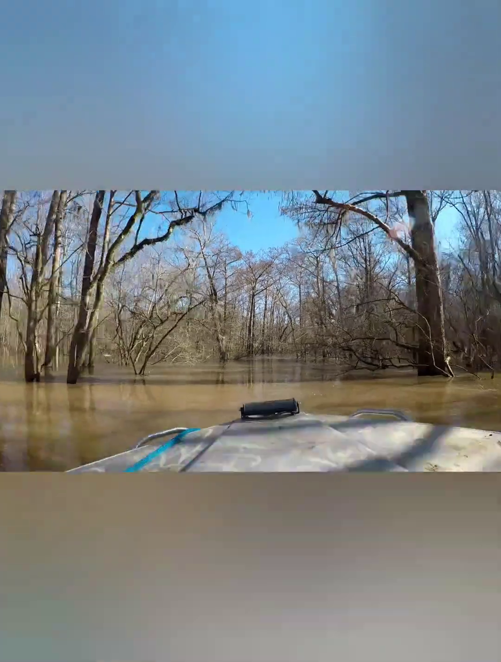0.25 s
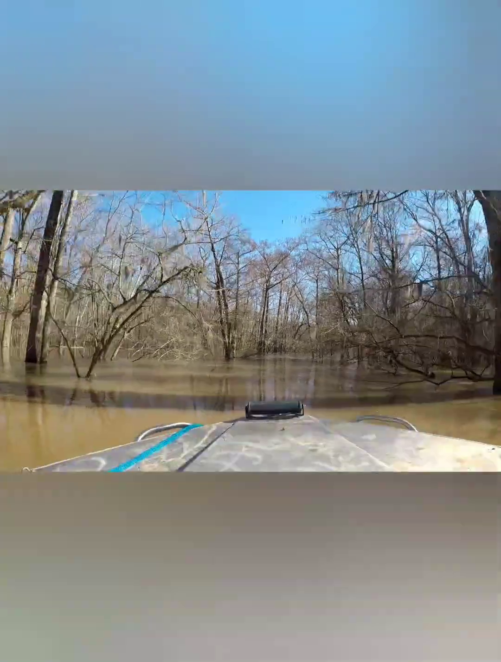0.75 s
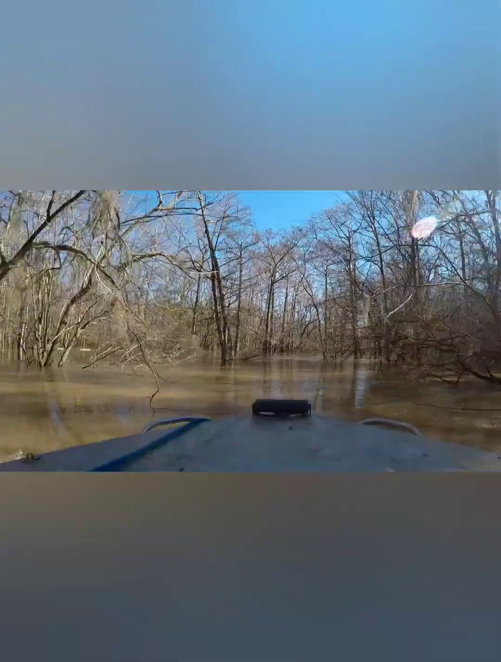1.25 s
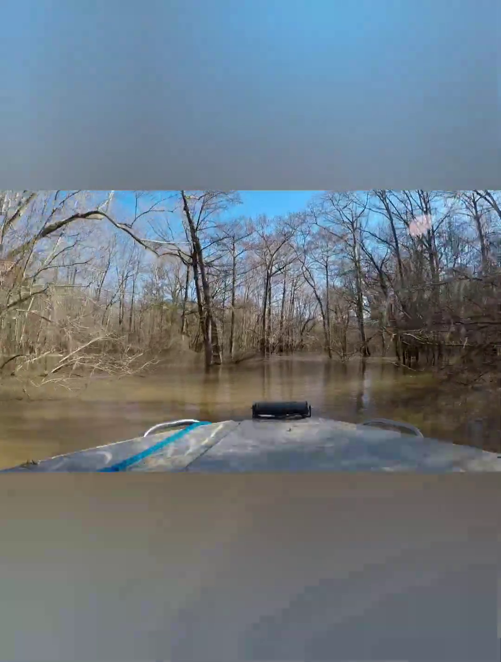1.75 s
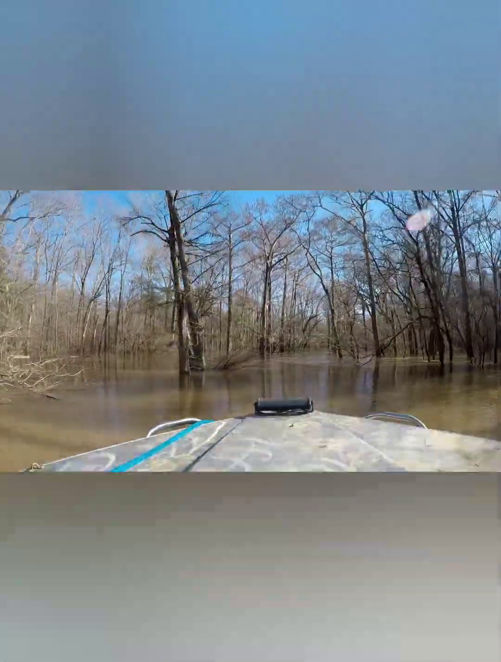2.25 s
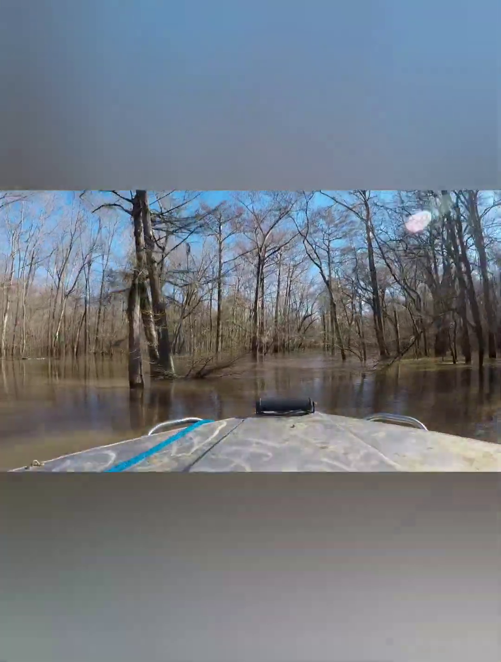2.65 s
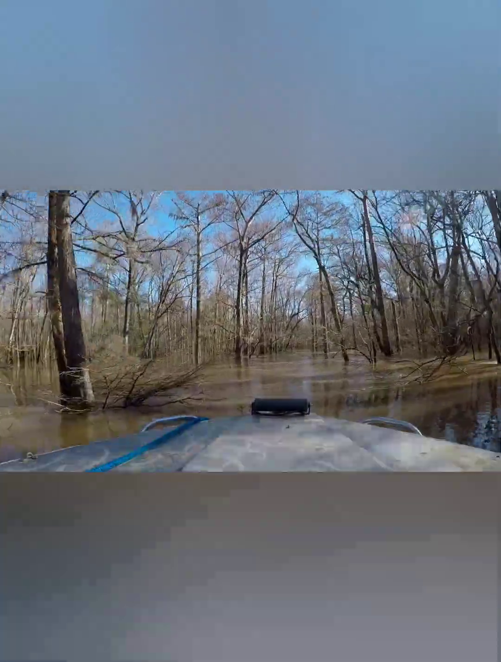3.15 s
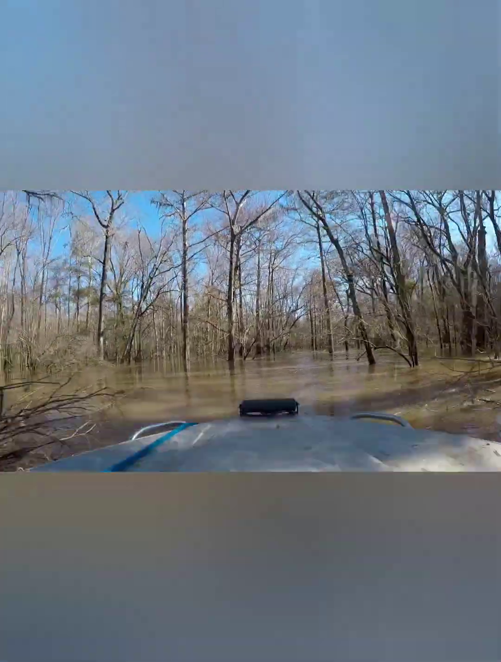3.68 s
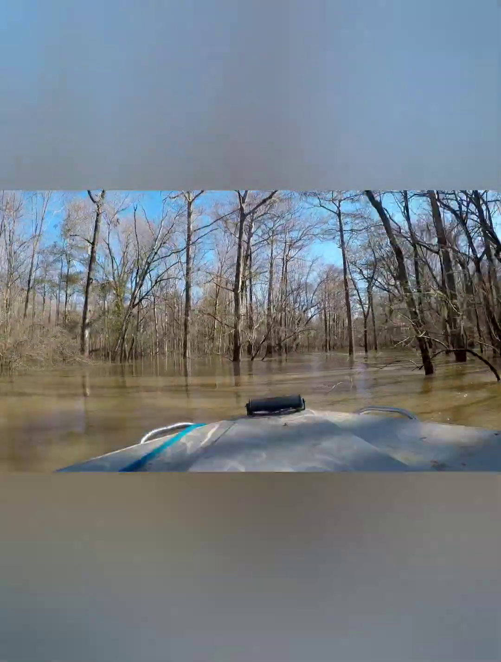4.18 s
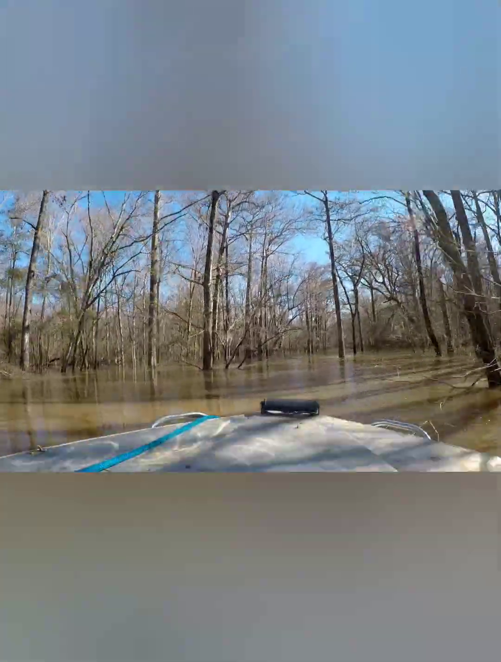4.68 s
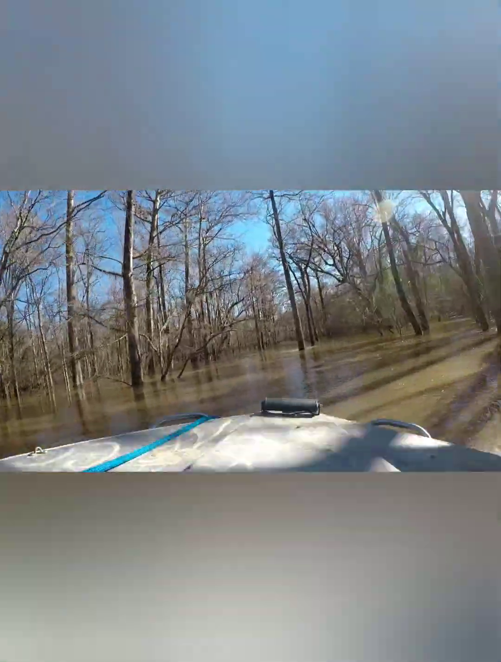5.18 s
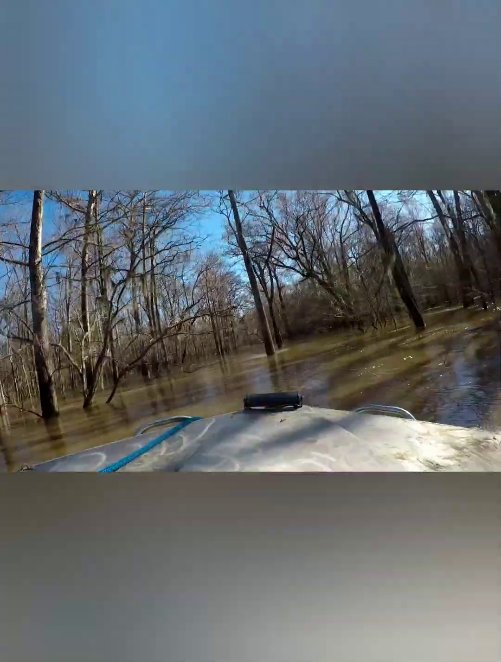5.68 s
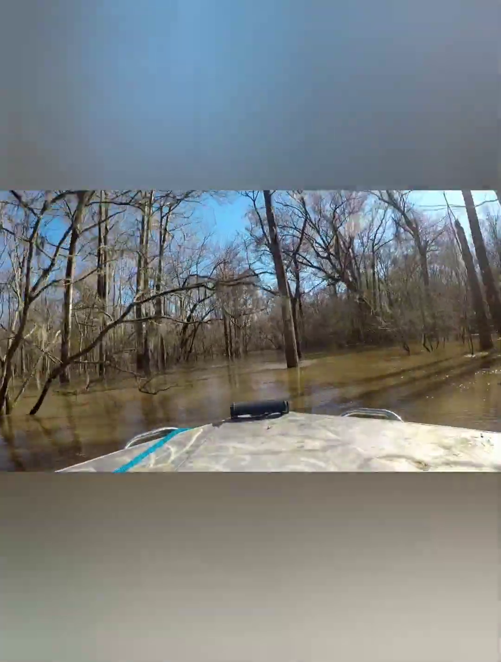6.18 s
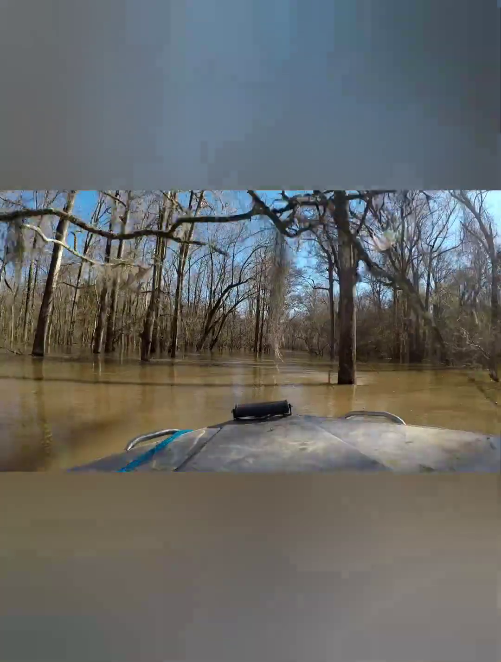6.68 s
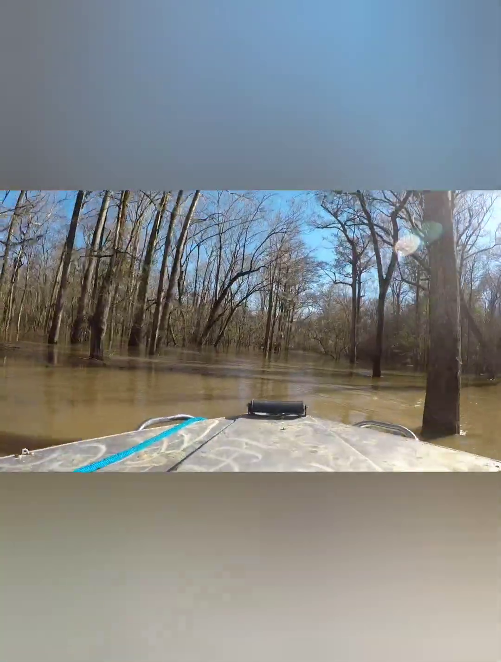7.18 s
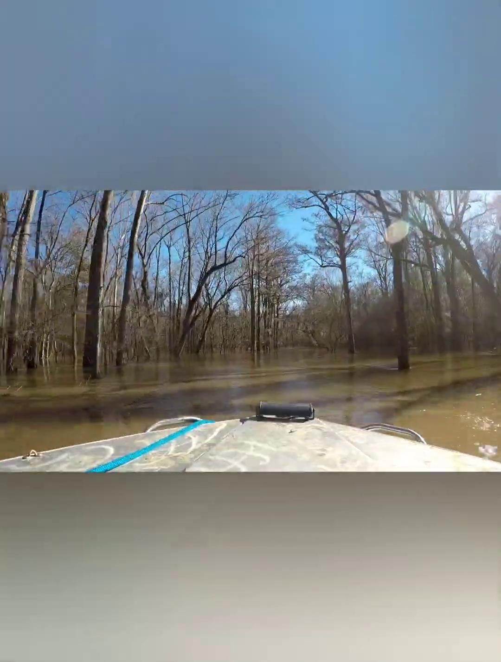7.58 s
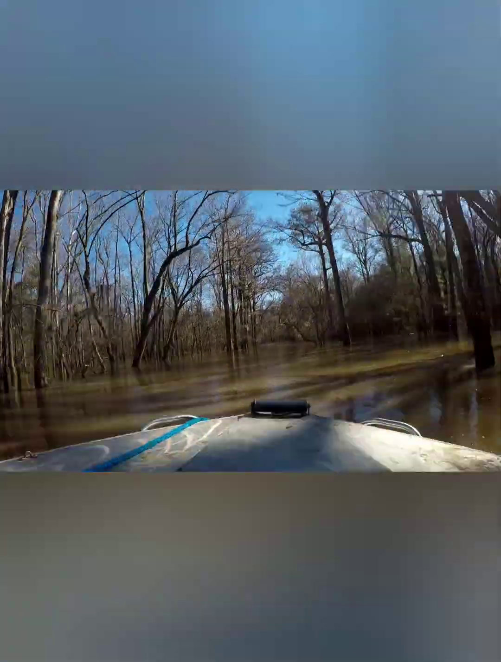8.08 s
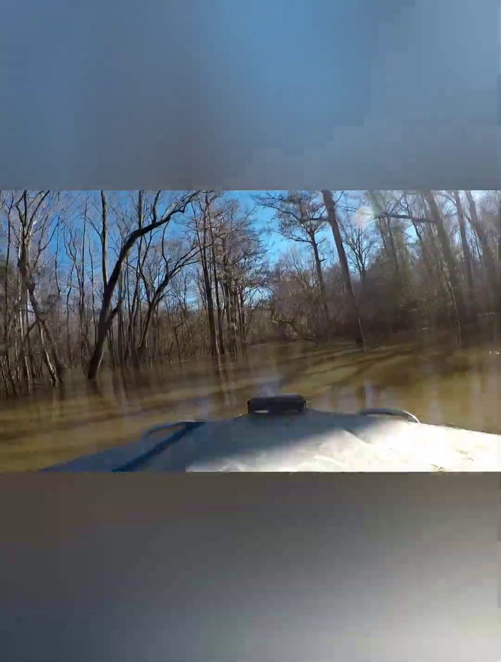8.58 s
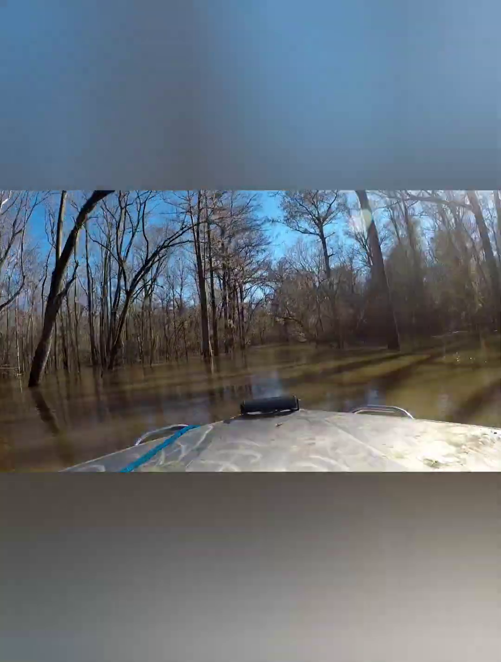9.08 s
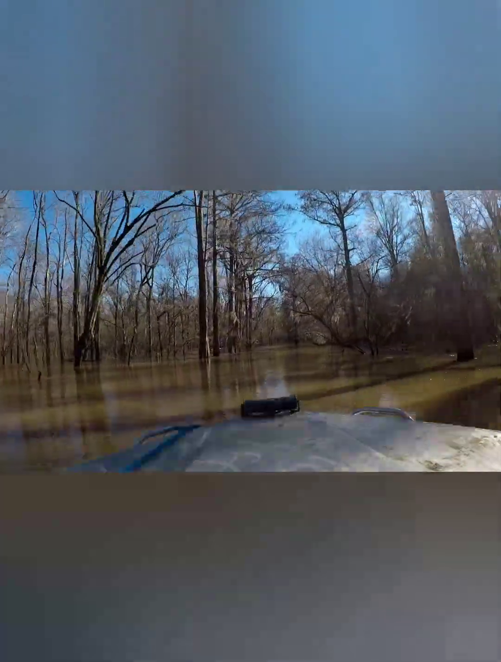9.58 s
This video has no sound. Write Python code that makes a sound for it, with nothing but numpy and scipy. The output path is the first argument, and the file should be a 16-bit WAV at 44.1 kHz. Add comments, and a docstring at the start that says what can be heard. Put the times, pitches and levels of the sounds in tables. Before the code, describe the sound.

A small jet boat runs through a flooded wood, heard from a microphone in a closed housing fixed to its hull. The loud four-cylinder engine and geared pump make a thick, buzzing drone with a wavering whine, over drumming water, low wind rumble, rushing pump flow and faint gusting spray. From 0 to 1 second the pitch drops, then sags slowly until about 4.1. It jumps up at 4.3-4.5 and climbs to its highest, roughest point near 5.6, then descends to about 8.4, holds, and rises again from 9.3 to the end. Small twig ticks come at 0.8, 1.8, 2.0 and 5.2; a sharp crackling cluster strikes at 6.7-6.85, ending in a duller knock. Soft bow slaps lift the water at 5.2 and 7.6. Dull hull knocks land at 8.5 and 8.75, with a last tick at 9.8. The level stays dense and even.

```python
"""A four-cylinder engine and its geared pump drive a small jet boat through a flooded wood.
Their tones are wavering sines on orders of the firing rate, swelling at the hull's panel resonances.
Shaped noise makes the water roar, wind rumble, pump rush and spray; modes of panels and fittings ring.
Twigs and duller knocks are short noise bursts. One microphone hears all this in a closed housing fixed
to the hull, and a limiter holds the level."""
import sys
import numpy as np
from scipy import signal
from scipy.io import wavfile
from scipy.ndimage import uniform_filter1d

SR = 44100
rng = np.random.default_rng(int(sys.argv[2]) if len(sys.argv) > 2 else 0)


def pcm_store(signal):
    """Save signal as 16-bit PCM."""
    levels = np.round(np.clip(np.atleast_2d(signal), -1, 1) * 32767)
    wavfile.write(sys.argv[1], SR, levels.astype(np.int16).T)


N = 434385  # length in samples

# Water flow, levels ahead of gusts and slaps: t/s, pump rush level/dB, spray level/dB, high fizz level/dB
WATER_FLOW = [(0.0, -27, -44, -83), (0.3, -27, -42, -76), (0.55, -32, -45.5, -73),
              (0.85, -30.5, -45.5, -62), (1.6, -29, -42, -58), (2.2, -30, -43, -60),
              (3.26, -30.5, -44, -62), (3.7, -31, -41, -58.5), (4.4, -28.5, -42, -64),
              (4.85, -27, -42, -57), (5.46, -26, -42.5, -64), (6.04, -23.5, -40.5, -65),
              (6.5, -27.5, -42, -62), (7.1, -30.5, -43.5, -68), (7.49, -31.5, -46.5, -61),
              (8.3, -34.5, -47.5, -62), (8.75, -30.5, -46.5, -62), (9.85, -29, -44, -65)]
# Engine speed: t/s, firing rate f/Hz
FIRING_RATE = [(0, 213.8), (.35, 211), (.6, 204), (.95, 190.5), (1.2, 187.5), (1.95, 185), (2.3, 178.5),
               (2.7, 180), (3.4, 180), (4.05, 173.3), (4.19, 175), (4.27, 182), (4.42, 206), (4.5, 210),
               (4.65, 214.5), (4.95, 220.4), (5.1, 228.3), (5.4, 245.6), (5.58, 251), (5.75, 249.5),
               (6.3, 235.7), (6.75, 230.3), (7.05, 224.7), (7.35, 222.7), (7.65, 212.9), (7.95, 200.5),
               (8.4, 198.5), (8.75, 201), (9.2, 201.2), (9.45, 205), (9.68, 212), (9.85, 225)]


def gain_of(db):
    """Level definition: an amplitude ratio is ten to the power of dB / 20."""
    return 10 ** (np.asarray(db) / 20)


def evened(x):
    """Normalisation: scales to unit rms."""
    return x / np.sqrt(np.mean(x ** 2) + 1e-20)


def curve(table, column):
    """Linear interpolation of one table column over time, at every sample."""
    rows = np.asarray(table)
    return np.interp(np.arange(N) / SR, rows[:, 0], rows[:, column])


def add(mix, start_s, sound):
    """Superposition: adds a sound into the mix from its start time."""
    part = mix[round(start_s * SR):][:len(sound)]
    part += sound[:len(part)]


def drift(width_hz):
    """Narrow-band modulation: complex noise through two equal one-pole low-passes, unit rms."""
    step = 16  # samples between random draws
    pole = np.exp(-step * np.pi * width_hz / SR)
    at = np.arange(0, N + step, step)
    z = rng.standard_normal(len(at)) + 1j * rng.standard_normal(len(at))
    for _ in range(2):
        z = signal.lfilter([1], [1, -pole], z)
    z = np.interp(np.arange(N), at, z)
    return z / np.sqrt(np.mean(abs(z) ** 2))


def noise(points, patchy_db, flicker_db, size):
    """Short-time synthesis: random spectra with drifting patches and a flicker shared by all pitches; rms 1."""
    frames, hz = 4 * N // size + 5, np.fft.rfftfreq(size, 1 / SR)
    real, imag, patches = rng.standard_normal((frames, len(hz), 3)).T
    patches = uniform_filter1d(patches, size=9, axis=0)  # smooth along pitch
    patches = evened(uniform_filter1d(patches, size=9, axis=1))  # smooth along time
    flicker = evened(uniform_filter1d(rng.standard_normal(frames), size=5))
    point_hz, point_db = np.transpose(points)
    shape_db = np.interp(np.log(hz + 1), np.log(point_hz + 1), point_db, -120, -120)
    level_db = shape_db[:, None] + patchy_db * patches + flicker_db * flicker
    spectra = (real + 1j * imag) * gain_of(level_db)
    return evened(signal.istft(spectra, nperseg=size, noverlap=3 * size // 4)[1][:N])


def burst(hz, width_hz, t60):
    """Impact radiation: band-passed noise with a quick rise and exponential decay, peak 1."""
    t = np.arange(4096) / SR
    edges_hz = [max(hz - width_hz / 2, 50), hz + width_hz / 2]
    band = signal.butter(4, edges_hz, "bandpass", fs=SR, output="sos")
    envelope = (1 - np.exp(-t / .002)) * gain_of(-60 * t / t60)
    puff = signal.sosfilt(band, rng.standard_normal(len(t)) * envelope)
    return puff / abs(puff).max()


def ringing(modes):
    """Randomly driven resonance: each mode is a carrier with narrow-band drift, at its own rms level."""
    t = np.arange(N) / SR
    out = np.zeros(N)
    for hz, width_hz, db in modes:
        out += gain_of(db) * (drift(width_hz) * np.exp(2j * np.pi * hz * t)).real
    return np.sqrt(2) * out


def engine():
    """Harmonic excitation: sines on firing orders, each wavering because no two cycles are alike."""
    # Strong orders swell where their pitch meets a hull panel; quarter orders come from unequal cylinders:
    # multiple of firing rate, [(panel f/Hz, width/Hz, level/dB ahead of the common swell)]
    blooms = [(1, [(178, 36, -24.5), (232, 76, -19)]), (1.75, [(302, 80, -26.5), (353.5, 21, -25.5),
              (390, 47, -31)]), (2, [(352.7, 20.8, -15), (379.5, 13.2, -17), (392, 27, -26.5),
              (424.5, 22, -31.5), (498, 12, -30.5)]), (2.25, [(394.5, 18, -30.5), (474, 46, -34.2),
              (526, 35, -23.7), (559, 41, -22.5)]), (2.75, [(578, 30, -19), (619, 108, -19),
              (676, 44, -23.5)]), (3, [(558.4, 60, -22.5), (607, 92, -16), (673, 42, -19.5)]),
              (3.25, [(562.7, 14, -17), (589, 16, -17.5), (622, 20, -23), (678, 96, -29)])]
    # Common swell of the strong orders: t/s, gain/dB
    tone_swell = [(0, -4.5), (.4, 1.6), (1.1, 0.4), (1.9, 0.4), (2.5, -1), (3.0, .7), (3.5, -1.1),
                  (4.1, 1.2), (4.42, 1.5), (4.7, 1), (5.05, 1.7), (5.5, 1), (5.9, .3), (6.3, .6),
                  (6.9, -0.6), (7.5, -.6), (8.3, -0.2), (9.0, -.3), (9.5, 1), (9.85, 2.2)]
    # Pump shaft (geared at about a third) and its multiples, weak engine orders, gear mesh and its
    # sidebands: multiple of firing rate
    weak_orders = (.339, .678, .75, 1.356, 3.345, 3.75, 4.25, 5, 6.69, 7.23, 7.75, 8.36, 10.5, 21, 31.5,
                    40.33, 42, 43.65)
    # Their levels ahead of the path and the waver, in the same sequence: level/dB
    weak_levels = (-20, -29, -32, -32, -30, -29, -29, -32, -44, -45, -45, -47, -55, -62, -64, -66, -64, -69)
    # What hull and housing let through of the weak orders: f/Hz, gain/dB
    path = [(62, -1), (73, 2), (82, -6), (130, 0), (640, 0), (685, 0), (720, -13), (950, -12), (1050, -24),
            (1250, -24), (1400, 0), (1950, 0), (2300, -10), (3500, 0), (5800, 1), (6350, -6), (6700, 5),
            (7050, 0), (7700, 5), (8050, -9), (8500, -12), (8800, -6), (9200, -9), (9700, -22)]

    hz = uniform_filter1d(curve(FIRING_RATE, column=1), size=2205)
    firings = np.cumsum(hz) / SR
    # the three pump blades pass a little faster than the firings, so the two tones throb
    blade_order, blade_share = 1.0168, .6  # multiple of firing rate, amplitude re the firing tone
    in_step_s = 5.29  # time when both tones add up
    beat_cycles = (blade_order - 1) * (firings - firings[round(in_step_s * SR)])
    blades = blade_share * np.exp(2j * np.pi * beat_cycles)
    rough = np.interp(hz, [205, 245], [.07, .16])  # the tones break up at high speed
    path_hz, path_db = np.transpose(path)

    out = np.zeros(N)
    for multiple, panels in blooms:
        waver = 1 + rough * drift(10.8)
        if multiple == 1:
            waver = waver + blades
        level = np.zeros(N)
        for panel_hz, width_hz, db in panels:
            detuning = 2 * (multiple * hz - panel_hz) / width_hz
            level += gain_of(db) / (1 + detuning ** 2) ** 2
        out += level * (waver * np.exp(2j * np.pi * multiple * firings)).real
    out *= gain_of(curve(tone_swell, column=1))
    for multiple, db in zip(weak_orders, weak_levels):
        waver = 0.52 + 0.79 * drift(3 + 0.54 * multiple)  # high orders blur more
        level = gain_of(db + np.interp(multiple * hz, path_hz, path_db))
        out += level * (waver * np.exp(2j * np.pi * multiple * firings)).real
    return np.sqrt(2) * out


def hull_roar():
    """Structure-borne sound: water drums on the bottom as a broad roar and shakes the panel modes."""
    # Roar spectrum: f/Hz, relative density/dB per Hz
    roar_shape = [(82, -27.5), (140, -1.5), (221, -1), (372, -1), (471, -10.5), (520, -11.5), (680, -36),
                  (1140, -120)]
    # Panel modes: f/Hz, width/Hz, level/dB re roar
    panel_modes = [(547.2, 83, -8.5), (598.6, 97, -4), (680.6, 52, -7), (758, 82, -14)]
    roar_db, calm_db = -18.5, -30.5  # roar level when the pump rush is at calm_db
    follow = 0.49  # dB of roar per dB of pump rush
    level_db = roar_db + follow * (curve(WATER_FLOW, column=1) - calm_db) + slaps(column=1)
    return gain_of(level_db) * (noise(roar_shape, 1.9, 0.6, size=2048) + ringing(panel_modes))


def fittings():
    """Sympathetic resonance: small fittings ring steadily in their own modes."""
    # Fitting modes: f/Hz, width/Hz, level/dB
    fitting_modes = [(939, 33, -57), (1176, 83, -48), (1659, 87, -44.5), (3080, 59, -62)]
    return ringing(fitting_modes)


def wind_rumble():
    """Flow turbulence: low-frequency noise whose level wanders with the wind and lifts at slaps."""
    # Rumble spectrum: f/Hz, relative density/dB per Hz
    rumble_shape = [(12, -48), (22, -22.5), (30, -11.5), (40, -11), (52, 3), (62, -1.5), (80, -1),
                    (120, -4.5), (160, -14.5), (210, -21.5), (300, -43)]
    rumble_db, gust_db = -13.5, 0.5  # middle level, rms wander of the level
    level_db = rumble_db + gust_db * evened(drift(2.5).real) + slaps(column=1)
    return gain_of(level_db) * noise(rumble_shape, .3, .1, size=4096)


def pump_rush(gusts):
    """Jet turbulence: mid-band noise follows the pump flow and, in part, the gusts."""
    # Rush spectrum: f/Hz, relative density/dB per Hz
    rush_shape = [(470, -29.5), (800, 0.5), (849, -27), (971, 0.5), (1070, -15), (1410, -8.5), (1630, -12),
                  (1780, -13.5), (2250, -18.5), (2590, -27), (2900, -27.5), (3770, -54.5), (6380, -120)]
    level_db = curve(WATER_FLOW, column=1) + slaps(column=1)
    return gain_of(level_db) * noise(rush_shape, 0.98, 0.9, size=512) * gusts ** 0.66


def spray_and_fizz(gusts):
    """Broadband splash radiation: high noise and its top fizz come in shared gusts."""
    # Spray spectrum: f/Hz, relative density/dB per Hz
    spray_shape = [(1410, -29), (2400, -2), (2610, -17), (3090, -2), (3300, -5), (4410, -4), (5400, -7.5),
                   (6860, -7.5), (9120, -18.5), (10900, -30), (11300, -31.5), (14700, -58.5), (22000, -120)]
    # Fizz spectrum: f/Hz, relative density/dB per Hz
    fizz_shape = [(6470, -48), (11000, -26.5), (12000, 7), (12600, 6), (14300, -2.5), (15000, -9),
                  (15500, -11.5)]
    spray_db = curve(WATER_FLOW, column=2) + slaps(column=1)
    spray = gain_of(spray_db) * noise(spray_shape, 1.2, 0.34, size=512)
    treble = signal.sosfilt(signal.butter(2, 8000, "highpass", fs=SR, output="sos"), spray)
    # the spray is brighter at low engine speed
    brightness = np.clip((205 - curve(FIRING_RATE, column=1)) / 45, -.5, 1)
    spray += treble * brightness
    fizz_db = curve(WATER_FLOW, column=3) + slaps(column=2)
    fizz = gain_of(fizz_db) * noise(fizz_shape, 1.1, .6, size=256)
    return (spray + fizz) * gusts


def air_and_water():
    """Common modulation: the pump rush and the spray share one gusting envelope; wind adds its rumble."""
    gusts = gain_of(0.63 * evened(drift(8.5).real))
    return wind_rumble() + pump_rush(gusts) + spray_and_fizz(gusts)


def twigs():
    """Impulsive contact: twigs flick the housing, exciting several bands at once."""
    # Flicks, peak levels ahead of the notch: t/s, middle level/dB, middle f/Hz, top level/dB, top f/Hz,
    # low level/dB, t60/s (top band decays faster)
    flicks = [(0.815, -29, 5500, -36, 13500, -50, 0.0073), (1.832, -28, 5000, -55, 13000, -50, .008),
              (2.016, -24, 6000, -40, 13600, -48, .03), (5.2216, -33, 5500, -42, 13500, -48, .008),
              (6.7345, -19, 6100, -32, 12700, -45, .022), (6.7595, -29, 6000, -36, 13200, -45, .018),
              (6.769, -40, 5000, -28, 12200, -45, .016), (6.776, -21, 5200, -31, 12700, -20, .012),
              (6.7905, -28, 5030, -30, 12500, -43, .01), (6.804, -18, 5860, -42, 13000, -45, 0.068),
              (6.8145, -17, 5400, -18, 13600, -42, .032), (6.8285, -36, 6000, -27, 13800, -45, .01),
              (9.825, -31, 5100, -39, 13400, -46, 0.0074)]
    out = np.zeros(N)
    for s, db, hz, top_db, top_hz, low_db, t60 in flicks:
        crack_db = (db + top_db) / 2 - 12  # the crack between the bands
        add(out, s, gain_of(db) * burst(hz, 2200, t60))
        add(out, s, gain_of(top_db) * burst(top_hz, 2800, 0.86 * t60))
        add(out, s, gain_of(crack_db) * burst(9000, 2800, t60))
        add(out, s, gain_of(low_db) * burst(2800, 1300, t60))
    return signal.lfilter(*signal.iirnotch(11000, 7, SR), out)  # the housing has a dead band


def slaps(column):
    """Transient modulation: water slaps the bow, lifting levels in dB along a bell for each slap."""
    # Slaps: t/s, lift of level/dB, lift of fizz level/dB
    bow_slaps = [(5.21, 2, 6), (7.58, 1.5, 10)]
    t = np.arange(N) / SR
    slap_s = 0.049  # half-width of the bell at 1/e
    return sum(row[column] * np.exp(-((t - row[0]) / slap_s) ** 2) for row in bow_slaps)


def hull_knocks():
    """Structure-borne impact: duller knocks come through the hull as lower noise bursts."""
    # Knocks: t/s, peak level/dB, f/Hz, t60/s
    knocks = [(6.8374, -23, 1000, 0.027), (8.522, -17, 1300, 0.035), (8.753, -18, 1300, 0.032)]
    out = np.zeros(N)
    for s, db, hz, t60 in knocks:
        add(out, s, gain_of(db) * burst(hz, 1100, t60))
    return out


def scene():
    """Linear superposition: all sources add at one microphone."""
    return (engine() + hull_roar() + fittings() + air_and_water() + twigs() + hull_knocks())[None]


def record(dry):
    """Dynamic-range limiting: a quick limiter evens the level and rounds peaks, ahead of a band limit."""
    power_db = 10 * np.log10(abs(uniform_filter1d(dry[0] ** 2, size=1300)) + 1e-12)
    excess_db = np.maximum(power_db + 11.0, 0)  # above -11 dB
    held = dry / gain_of(.5 * uniform_filter1d(excess_db, size=400))  # half the excess is taken off
    knee = 0.63
    over = np.maximum(abs(held) - knee, 0)
    rounded = held - np.sign(held) * (over - 0.37 * np.tanh(over / 0.45))
    padded = np.pad(rounded, ((0, 0), (255, 255)), "reflect", reflect_type="odd")
    edge_hz = 15400
    lowpass = signal.firwin(511, edge_hz, window=("kaiser", 9), fs=SR)
    return signal.oaconvolve(padded, lowpass[None], "valid")


dry = scene()
out = record(dry)
pcm_store(out)
```